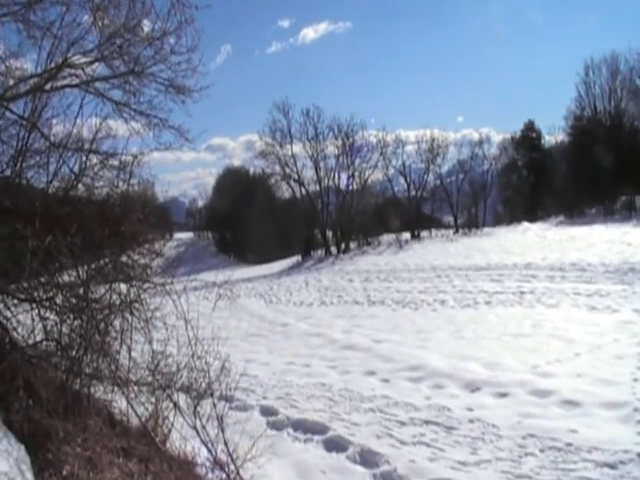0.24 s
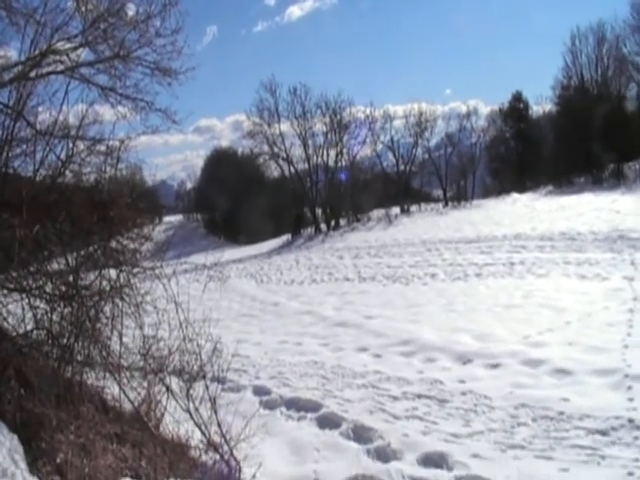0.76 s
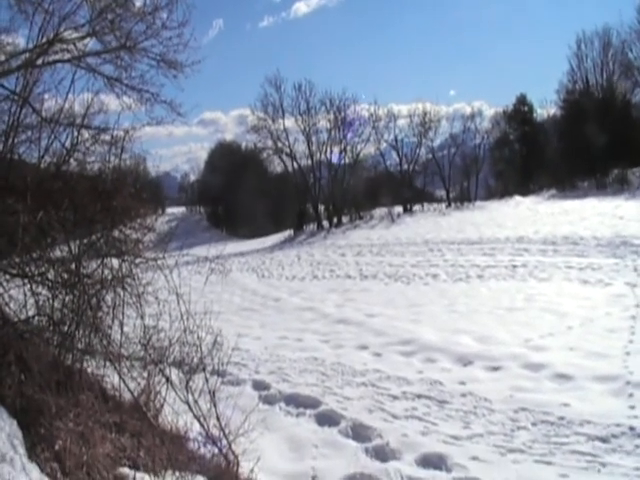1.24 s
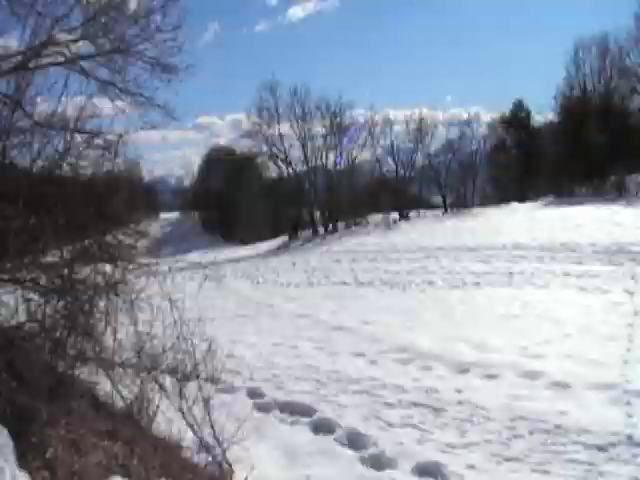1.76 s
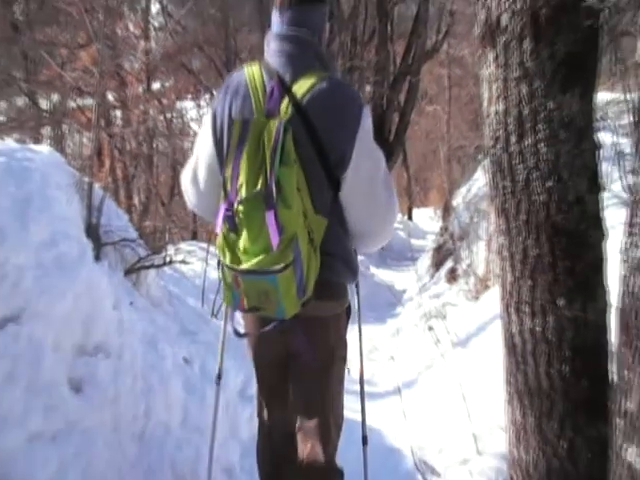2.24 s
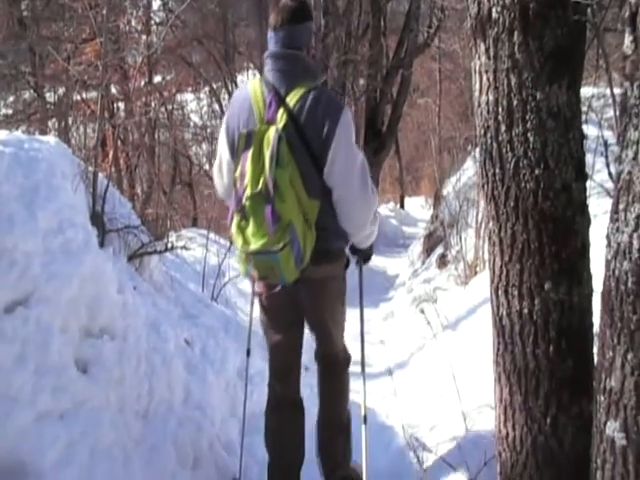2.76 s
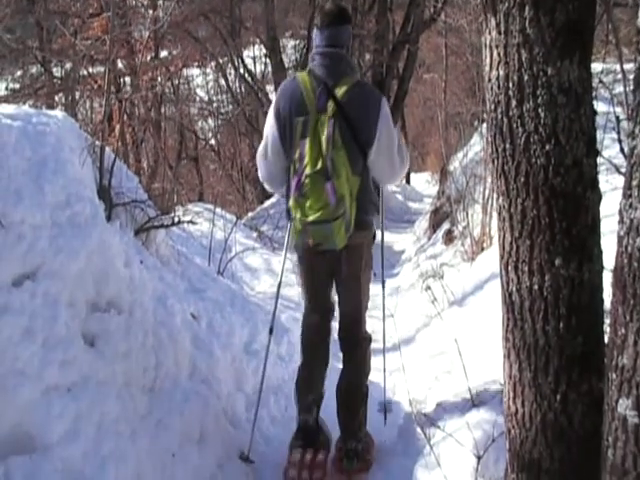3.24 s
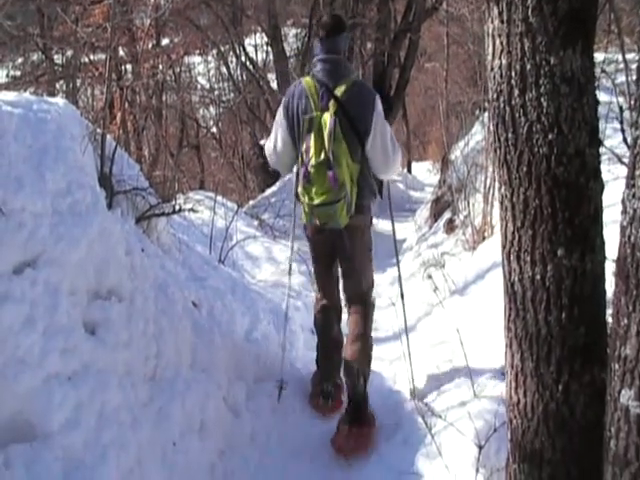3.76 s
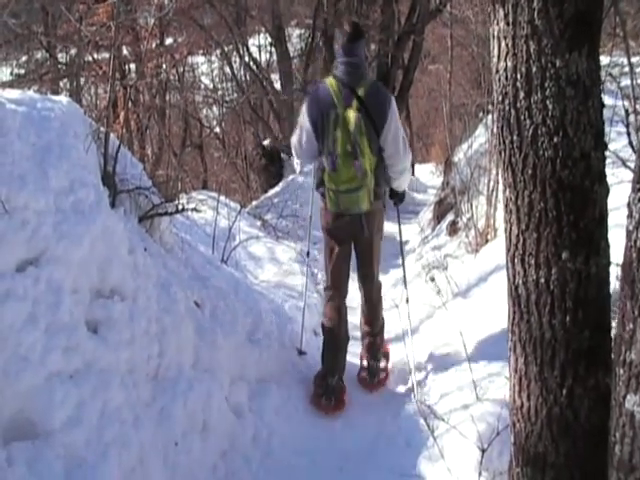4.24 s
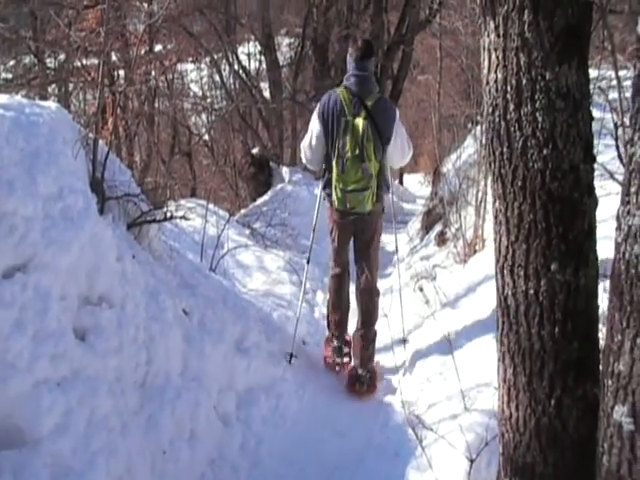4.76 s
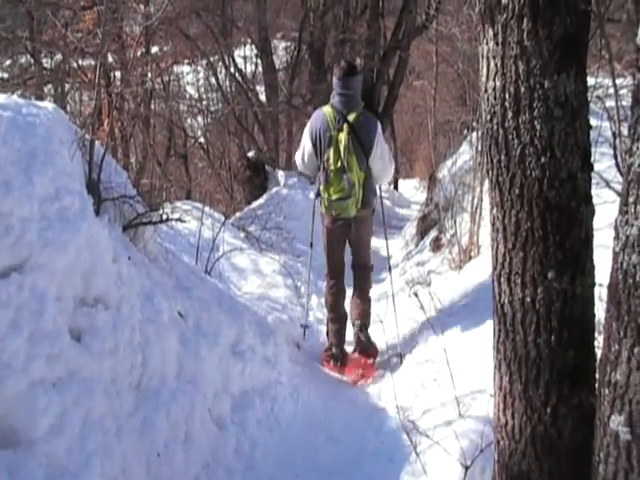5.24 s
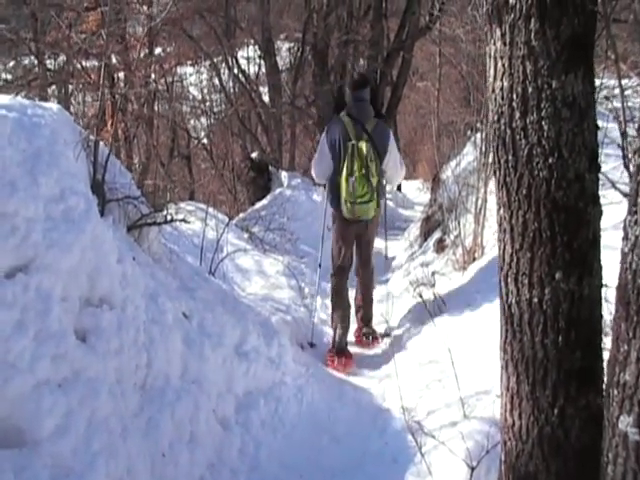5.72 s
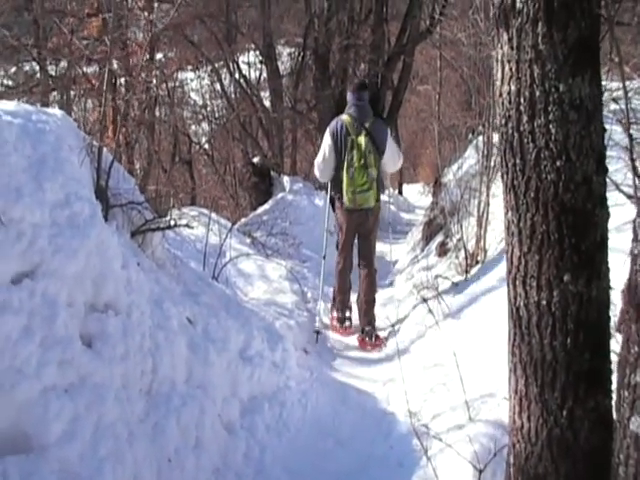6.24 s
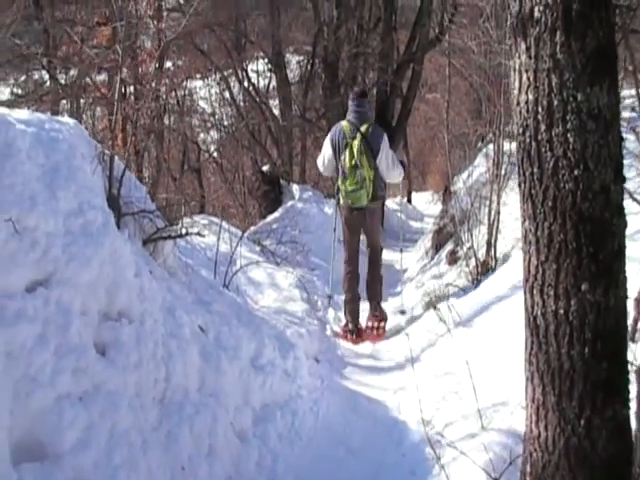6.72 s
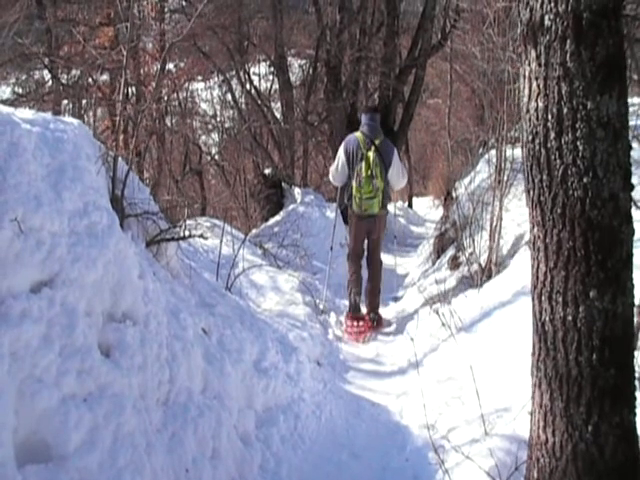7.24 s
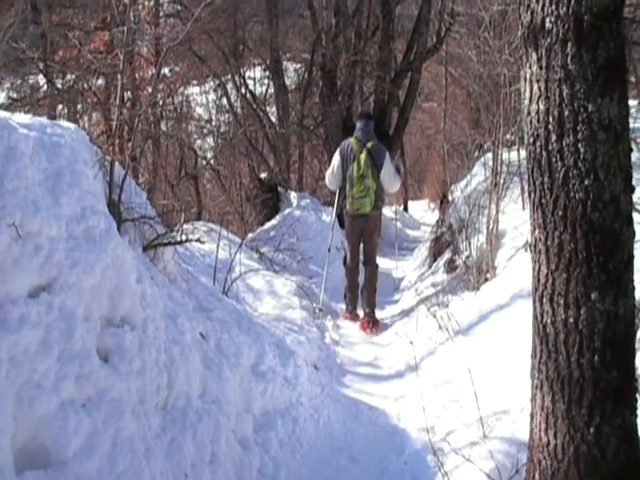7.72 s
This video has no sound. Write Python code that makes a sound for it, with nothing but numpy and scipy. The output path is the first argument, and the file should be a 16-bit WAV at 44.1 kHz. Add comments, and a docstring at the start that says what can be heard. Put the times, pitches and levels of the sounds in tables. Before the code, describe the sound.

From 0 to 1.9 seconds, a still snowy field is almost silent: thin hiss, a very faint steady motor whine near the camera, and from about 0.6 soft rustles and low wind puffs. A dull plastic tick comes at 0.8, a brighter, louder one at 0.95; the strongest wind rumble bumps at 1.4, with a smaller one at 1.7. At 1.9 an abrupt cut brings close, loud snowshoe crunching and a fuller background hiss. Dense, gritty grains swell and break off, with bright ice cracks crowding 1.9 to 2.4, then heavy crunches around 2.6 and sharp snaps at 3.1, 3.4, 3.5 and 4.0. Between steps the dragging shoe tail makes short crumbly bursts. After 4.2 it grows lighter and gappier, with cracks near 5.3, 5.9 and 6.4. Fainter, receding crunches continue to about 8 seconds, with crisp snaps at 7.65 and 7.8.

```python
"""A walker on snowshoes moves away: grains of noise swell into dense crunches, with ringing cracks of crust
and short bursts as the dragged shoe tail bumps along. This starts after a cut from a still snowy field.
In the field, low rumbling noise makes puffs of wind on the microphone, and soft grains make faint rustles.
The camera body ticks twice, as fading tones with a rattle; its motor whines faintly, a wavering sine.
Filtered noise makes the background hiss, which changes at the cut."""
import sys
import numpy as np
from scipy import signal
from scipy.fft import rfft, irfft, next_fast_len
from scipy.io import wavfile
from scipy.ndimage import uniform_filter1d

SR = 44100
rng = np.random.default_rng(int(sys.argv[2]) if len(sys.argv) > 2 else 0)


def generate_wav(signal):
    """Clip the signal to [-1, 1] and save it as 16-bit WAV at the path in sys.argv[1]."""
    frames = np.transpose(np.atleast_2d(signal))
    scaled = np.clip(frames, -1, 1) * 32767
    pcm = np.round(scaled).astype(np.int16)
    wavfile.write(sys.argv[1], SR, pcm)


N = 351918
CUT_S = 1.892  # the field ends and the walk begins

# Steps of the walker. Each row: shoe touches in seconds, full weight in seconds, shoe lifts in seconds,
# level in dB.
STEPS = [(1.89, 2.0, 2.05, -28), (2.113, 2.144, 2.21, -40), (2.47, 2.618, 2.76, -31),
         (2.832, 2.97, 3.09, -34), (3.12, 3.25, 3.425, -29.5), (3.648, 3.67, 3.66, -42),
         (3.724, 3.916, 4.02, -29), (4.328, 4.512, 4.68, -33.5), (5.035, 5.25, 5.275, -33.5),
         (5.299, 5.317, 5.31, -34.5), (5.377, 5.4, 5.44, -39.5), (5.59, 5.634, 5.685, -41.5),
         (5.733, 5.9, 6.06, -37.5), (6.39, 6.58, 6.655, -38), (7.113, 7.15, 7.24, -42),
         (7.25, 7.294, 7.41, -39), (7.771, 7.945, 8.27, -40)]
# The sound swells as weight comes on, sags as it rolls off and stops when the shoe lifts.
LOAD_DB_PER_S, SAG_DB_PER_S, LIFT_DB_PER_S = 41.5, 43, 502
# Loose snow trickles between steps and fades as the walker moves away.
LOOSE_DB, RECEDE_DB_PER_S = -54, 0.6

# Crunches as the crust gives way or the shoe tail bumps. Each row: start in seconds, level in dB,
# length in ms, swell from start to end in dB, tilt towards bright in dB.
CRUNCHES = [(1.89, -23, 45, 5, -1.5), (1.924, -28, 44, -4, -10), (1.974, -24, 25.6, 0, 0),
            (2.044, -18.5, 12.7, -6, 9), (2.074, -30, 5.7, -17, 2), (2.119, -27.5, 6, -5, 10),
            (2.127, -22, 30.4, -19, 11), (2.207, -22, 19, 0.5, 5.5), (2.272, -24.5, 9.5, -7, -5),
            (2.359, -28, 20, -10, -3.5), (2.401, -21.5, 4, 0, -10), (2.428, -35.5, 25.3, -6, 3),
            (2.464, -30, 43, -4, -4), (2.515, -31.5, 26, -2, 3), (2.553, -31.5, 40, -16, -9),
            (2.616, -24.5, 40.7, -2, -9.5), (2.674, -23.5, 43, -13, 2.5), (2.743, -23, 20.4, 3, 1),
            (2.818, -38.5, 23, 4, 2), (2.875, -24, 28, -11.5, 3), (2.925, -32, 8.2, -1, -4),
            (3.041, -27.5, 39, -7, 34), (3.119, -10, 5.8, -21, 26), (3.129, -32, 17, 15, 5),
            (3.245, -23, 33, 6, -5), (3.295, -25.5, 31, 1, -3), (3.37, -17, 19.6, -3, 6.5),
            (3.415, -38, 25, -6, -7), (3.5, -31, 6, 0, 9), (3.53, -21.5, 20.5, -1.5, 10),
            (3.598, -39, 9, -6, -20), (3.644, -33.5, 26, 2, 8.5), (3.771, -30, 27, -20.5, -10),
            (3.832, -28.5, 71, -8, -4), (3.978, -16.5, 11, 1.5, 10.5), (4.071, -24.5, 22.6, -12, 8),
            (4.108, -40, 5, -5, 0), (4.154, -38, 6, -13, 0), (4.188, -25, 24.7, -19.5, 1),
            (4.223, -33, 12, -4, -3), (4.256, -27.5, 9.5, -6, -10.5), (4.323, -34, 26, -17, 0.5),
            (4.367, -28.5, 9.7, -22, -14), (4.427, -27, 11, 0, -6), (4.517, -25, 28.8, 7, -7),
            (4.566, -26.5, 37, -16, 5), (4.623, -24.5, 13.5, 9.5, 12.5), (4.682, -34.5, 18, 5, -2.5),
            (4.748, -29.5, 21.4, 3, 9), (4.842, -32.5, 15.3, -7, 5), (4.927, -38, 11.6, 2, 18),
            (5.056, -36, 15.6, 2, 9), (5.123, -25.5, 10, -15, -10), (5.291, -27.5, 23, -7, 2),
            (5.333, -22, 17.5, -2, 10), (5.38, -36.5, 45, -13, -1), (5.431, -32.5, 13, -19, -14),
            (5.521, -35.5, 13, -5, 9), (5.56, -35.5, 5.8, -7, -4), (5.836, -32, 15, -17, 0),
            (5.881, -33, 40, -9, 9), (5.933, -22, 18.7, -5, 1), (6.015, -24.5, 16, -15, 7.5),
            (6.106, -29.5, 8, -30, 7), (6.154, -35.5, 13.4, 2, -2), (6.257, -38.5, 23, 0, 9.5),
            (6.389, -33.5, 14, -13, 9), (6.44, -21.5, 5.3, -27, 5.5), (6.533, -31, 95, -4.5, 1.5),
            (6.67, -44.5, 36, 7, -2), (6.705, -26.5, 22.2, 3.5, 5), (6.819, -33.5, 15.7, -1, 2),
            (6.925, -34, 19, -6, 9), (7.023, -28.5, 9, -8.5, -6), (7.109, -39.5, 9.2, -10, 13),
            (7.144, -35, 25.5, 6, 10), (7.274, -33, 35, 2, -3), (7.319, -31.5, 28, -12, 6),
            (7.405, -28.5, 15.5, 9, 8), (7.531, -34, 11.2, 4, 5), (7.643, -24, 15.2, -8, 12.5),
            (7.721, -32, 15.5, -17, -3.5), (7.777, -36, 10, 5, 9), (7.798, -33, 4, -9, -1),
            (7.817, -27.5, 7, -11, 5.5), (7.944, -27, 16, 0, -12)]
# Small random collapses of the snow
CLUMPS_PER_S, CLUMP_SPREAD_DB, CLUMP_MS = 45, 4.5, 8
CLUMP_SWELL_DB, CLUMP_TILT_DB = -5.5, 5
# Balance of every crunch; the tilt is split between its deep and bright parts.
DEEP_HZ, BRIGHT_HZ = 1300, 4500
DEEP_DB, BRIGHT_DB, DEEP_SHARE = -2.5, 3, .6
# Both ends of the crunch thin out as the walker moves away.
DEEP_FADE_DB_PER_S, BRIGHT_FADE_DB_PER_S = 0.81, 0.66

# Single loud breaks of ice and knocks of the crust. Each row: start in seconds, level in dB, pitch in Hz.
SNAPS = [(1.906, -16, 1780), (1.936, -3.5, 6800), (2.051, -5.5, 5500), (2.12, -19, 6960),
         (2.212, -6.5, 5700), (2.402, -20.5, 640), (2.645, -14, 2600), (3.121, -6.5, 8650),
         (3.141, -12.5, 840), (3.276, -12, 3380), (3.381, -6, 3670), (3.389, -3.5, 4330),
         (3.535, -10, 7940), (3.543, -7.5, 4850), (3.983, -4.5, 3080), (4.081, -18, 1380),
         (4.197, -12, 8300), (4.43, -23.5, 720), (4.54, -16.5, 2230), (5.077, -24, 3500),
         (5.125, -23.5, 600), (5.265, -21, 7000), (5.296, -14, 6500), (5.4, -19, 765), (5.94, -5.5, 6300),
         (6.024, -9, 4860), (6.11, -20, 6300), (6.441, -4.5, 7730), (7.651, -16.5, 9000),
         (7.817, -13, 7600)]

# Tone of the snow. Each row: frequency in Hz, gain in dB.
SNOW_TONE = [(90, -5.5), (160, -1), (300, -4), (450, 3), (800, 3), (1200, 2.5), (1450, 4), (1900, -2),
             (3000, 2), (4400, 1.5), (6800, 8.5), (10900, 5), (16000, -10.5)]
# How much differs between the two sides. Each row: frequency in Hz, gain of the unshared part in dB.
SIDE_TONE = [(100, -43.5), (500, -17), (1500, -74), (3000, -21), (7000, -15), (9500, -12), (12000, -11),
             (15000, -31)]
# Lean of the snow sound to one side. Each row: frequency in Hz, left minus right in dB.
LEFT_RIGHT_LEAN = [(300, -0.5), (1800, -1.5), (3600, -0.5), (4800, -0.5), (7500, -2), (9500, -3.5),
                   (11500, -2), (13000, 0)]

# Puffs of wind. Each row: peak in seconds, level in dB.
PUFFS = [(.66, -61), (.76, -56), (.89, -56), (1.06, -60), (1.27, -57.5), (1.44, -44.5), (1.54, -55),
         (1.7, -50), (2.2, -63)]
PUFF_RISE_DB_PER_S, PUFF_FALL_DB_PER_S, CALM_DB = 200, 200, -77.5
# Tone of the wind. Each row: frequency in Hz, gain in dB.
WIND_TONE = [(8.8, -32), (15, 7), (85, 10.5), (255, -7), (357, -34), (425, -11), (500, -31), (650, -66),
             (1100, -120)]

# Faint rustles near the camera. Each row: peak in seconds, level in dB.
RUSTLES = [(.585, -65), (.69, -58.5), (.8, -61), (.83, -56), (.88, -67), (1.08, -64), (1.16, -66),
           (1.7, -70), (1.8, -68)]
RUSTLE_RISE_DB_PER_S, RUSTLE_FALL_DB_PER_S, STILL_DB = 400, 200, -76.5

# Ticks of the camera body. Each row: start in seconds, level in dB, treble edge in Hz,
# time to fade by 60 dB in seconds (on top of the ringing's own fade), left minus right in dB.
TICKS = [(.822, -29.5, 2960, 0.039, -5), (.953, -15.5, 8400, 0.019, 4)]
# Ringing tones of the camera body. Each row: pitch in Hz, relative level in dB,
# time to fade by 60 dB in seconds.
SHELL_TONES = [(650, 5, 0.093), (1260, -3, 0.019), (1800, -16, .03), (2420, 11, 0.014), (3870, 2, 0.018),
               (5470, 9, 0.0053)]
# Whine of the camera motor. Each row: pitch in Hz, average level in dB.
WHINE = [(842.5, -72)]

# Still air and preamp hiss before the cut. Each row: frequency in Hz, gain in dB.
FIELD_TONE = [(24, -40), (40, -4), (412, -5), (680, -7), (831, -7), (918, -8.5), (4800, -17.5),
              (10000, -22.5), (16000, -33)]
# Background hiss after the cut. Each row: frequency in Hz, gain in dB.
WOODS_TONE = [(25, -1), (70, 0.5), (200, 17), (490, 3), (1400, 2), (5400, -3.5), (8800, -26), (11000, -18),
              (16000, -31)]
FIELD_DB, WOODS_DB = -63, -56

EDGE_HZ, CEILING = 16000, .9  # top of the band, loudest possible swing before the band limit


def snowshoes():
    """Snow grains in deep, middle and bright parts, each following its own pressure, plus the snaps."""
    grain_pair = grains(per_s=2000, spread_db=3.0, ring_ms=1.0, patchy_db=3.0)
    mid, side = colour(grain_pair, lambda hz: read(SNOW_TONE, hz))
    side = colour(side, lambda hz: read(SIDE_TONE, hz))
    both = np.array([mid, side])
    deep = colour(both, lambda hz: keep_below(hz, DEEP_HZ, 6))
    bright = colour(both, lambda hz: keep_above(hz, BRIGHT_HZ, 6))
    middle = both - deep - bright
    mid, side = sum(part / np.std(part[0]) * np.sqrt(power)
                    for part, power in zip((deep, middle, bright), pressure()))
    # Soft snow gives no thud and dulls the top.
    mid = colour(mid + snaps(), lambda hz: -10 * np.log10(1 + (140 / (hz + 1)) ** 6 + (hz / 12500) ** 6))
    left = colour(mid, lambda hz: read(LEFT_RIGHT_LEAN, hz) / 2)
    right = colour(mid, lambda hz: -read(LEFT_RIGHT_LEAN, hz) / 2)
    return np.array([left + side, right - side])


def pressure():
    """Power over time of the deep, middle and bright parts: steady packing plus separate crunches."""
    packing_db = packing()
    depth_db = 0.087 * (packing_db + 20.5)  # more weight on the shoe packs deeper snow
    balance_db = np.array([depth_db - 10.5, np.full(N, -6.0), -depth_db - 4.0])
    power = gain_of(packing_db + balance_db) ** 2
    ms = np.arange(0, 110, 1000 / SR)
    for s, db, length_ms, swell_db, tilt_db in CRUNCHES + clumps(packing_db):
        length_ms = max(length_ms, 2)
        over_ms = np.maximum(ms - length_ms, 0)
        body_db = swell_db * (np.minimum(ms / length_ms, 1) - .5) - 1.76 * over_ms
        crumbs_db = -27 - 0.076 * over_ms  # loose crumbs settle afterwards
        rise = np.minimum(ms / (3.0 + 0.19 * length_ms), 1) ** 2
        shape = rise * (gain_of(2 * body_db) + gain_of(2 * crumbs_db))
        walked_s = s - CUT_S
        deep_db = DEEP_DB - DEEP_FADE_DB_PER_S * walked_s - DEEP_SHARE * tilt_db
        bright_db = BRIGHT_DB - BRIGHT_FADE_DB_PER_S * walked_s + (1 - DEEP_SHARE) * tilt_db
        parts = gain_of([deep_db, 0, bright_db]) ** 2
        add(power, s, parts[:, None] / parts.sum() * gain_of(2 * db) * shape)
    return power * (np.arange(N) > CUT_S * SR)


def packing():
    """Level in dB of the steady packing: one weight shift per step, over trickling loose snow."""
    t = np.arange(N) / SR
    steps = []
    for touch, full, lift, db in STEPS:
        off_ground_s = np.maximum(touch - t, 0) + np.maximum(t - lift, 0)
        steps.append((full, db - LIFT_DB_PER_S * off_ground_s))
    loose_db = LOOSE_DB - RECEDE_DB_PER_S * (t - CUT_S)
    return swells(steps, LOAD_DB_PER_S, SAG_DB_PER_S, loose_db)


def clumps(packing_db):
    """Small collapses at random moments, their levels scattered around the packing level."""
    count = int(CLUMPS_PER_S * N / SR)
    when, size, long, tilt = rng.random((count, 4)).T
    s = (np.arange(count) + when) / CLUMPS_PER_S
    packing_now = packing_db[np.minimum((s * SR).astype(int), N - 1)]
    db = packing_now - CLUMP_SPREAD_DB * np.log(1 / (size + .02))
    length_ms = CLUMP_MS * (0.27 + long)
    swell_db = np.full(count, CLUMP_SWELL_DB)
    return list(zip(s, db, length_ms, swell_db, CLUMP_TILT_DB * (2 * tilt - 1)))


def grains(per_s, spread_db, ring_ms, patchy_db):
    """Snapping ice bonds: random clicks of uneven size become short noisy puffs with drifting colour."""
    size = gain_of(spread_db * np.minimum(rng.exponential(1, N), 5)) * (rng.random(N) < per_s / SR)
    fading = signal.lfilter([1], [1, -np.exp(-1000 / (ring_ms * SR))], size ** 2)
    soft = uniform_filter1d(fading, size=24)  # soft starts
    sharp = uniform_filter1d(size ** 2 * (size > 6), size=12)  # grains above size 6 would crack sharply, but no grain grows that large, so this adds nothing
    power = soft + .5 * sharp * ring_ms * SR / 1000
    puffs = np.sqrt(power) * rng.standard_normal((2, N))
    # Louder and softer patches across time and frequency
    hz, t, spectrum = signal.stft(puffs, SR, nperseg=256, noverlap=192)
    patches = uniform_filter1d(rng.standard_normal((len(t), len(hz))), size=14, axis=0)
    patches = evened(uniform_filter1d(patches, size=3, axis=1)).T
    patchy = spectrum * gain_of(patchy_db * patches)
    return signal.istft(patchy, SR, nperseg=256, noverlap=192)[1][:, :N]


def snaps():
    """Each break is a puff of gritty noise that also rings at its own pitch."""
    out, t = np.zeros(N), np.arange(1200) / SR
    for s, db, hz in SNAPS:
        noise = rng.standard_normal(len(t))
        puff = noise * np.minimum(t / 0.00019, 1) * np.exp(-t / 0.00056)
        ring = signal.lfilter(*signal.iirpeak(hz, 1 / 0.14, SR), puff)  # 14 % of the pitch wide
        grit = uniform_filter1d(puff, size=3)  # little extreme treble
        burst = ring / abs(ring).max() + 0.48 * grit / abs(grit).max()
        add(out, s, gain_of(db) * burst)
    return out


def wind():
    """Lumpy low noise, unrelated at the two microphone ports and stronger on the left."""
    lumps = uniform_filter1d(rng.standard_normal((2, N)), size=1500)
    lumps = evened(uniform_filter1d(lumps, size=1500))
    rumble = colour(rng.standard_normal((2, N)), lambda hz: read(WIND_TONE, hz))
    rumble = evened(rumble * gain_of(1.1 * lumps))
    level_db = swells(PUFFS, PUFF_RISE_DB_PER_S, PUFF_FALL_DB_PER_S, CALM_DB)
    return rumble * gain_of(level_db + np.array([[4.5], [-0.5]]))


def rustle():
    """Sparse soft grains in one broad resonance, until the cut."""
    scratch = grains(per_s=380, spread_db=1, ring_ms=2.6, patchy_db=5.0)[0]
    scratch = colour(scratch, lambda hz: -10 * np.log10(1 + ((hz - 1880) / 220) ** 2))
    level_db = swells(RUSTLES, RUSTLE_RISE_DB_PER_S, RUSTLE_FALL_DB_PER_S, STILL_DB)
    return evened(scratch) * gain_of(level_db) * (np.arange(N) < CUT_S * SR)


def camera():
    """A motor whine plus ticks of the plastic shell."""
    return motor_whine() + shell_ticks()


def motor_whine():
    """A sine that wavers slightly in loudness and phase, equal on both sides."""
    waver = evened(uniform_filter1d(rng.standard_normal(N), size=4000))
    turn = 2 * np.pi * np.arange(N) / SR
    whine = np.zeros(N)
    for hz, db in WHINE:
        whine += np.sqrt(2) * gain_of(db + .8 * waver) * np.sin(hz * turn + .5 * waver)
    return np.array([whine, whine])


def shell_ticks():
    """Each tick mixes the shell's fading tones with a noisy rattle."""
    ticks, t = np.zeros((2, N)), np.arange(1500) / SR
    ring = sum(gain_of(db - 60 * t / fade_s) * np.sin(2 * np.pi * hz * t) for hz, db, fade_s in SHELL_TONES)
    for s, db, treble_hz, fade_s, pan_db in TICKS:
        rattle = rng.standard_normal(len(t))
        tick = (0.12 * ring + .5 * rattle) * gain_of(-60 * t / fade_s)
        dull = signal.butter(2, min(treble_hz, SR / 2.2), fs=SR, output="sos")
        tick = signal.sosfilt(dull, tick)  # a soft tick has less treble
        add(ticks, s, gain_of(db + np.array([[.5], [-.5]]) * pan_db) * tick)
    return colour(ticks, lambda hz: keep_above(hz, 520, 8))


def air():
    """Background hiss from filtered noise, partly shared by both sides; it changes at the cut."""
    shared, left, right = rng.standard_normal((3, N))
    own = np.array([left, right])
    field = evened(colour(shared + 3.4 * own, lambda hz: read(FIELD_TONE, hz)))
    woods = evened(colour(shared + 0.37 * own, lambda hz: read(WOODS_TONE, hz)))
    after_cut = np.arange(N) > CUT_S * SR
    return np.where(after_cut, gain_of(WOODS_DB) * woods, gain_of(FIELD_DB) * field)


def swells(rows, rise_db_per_s, fall_db_per_s, rest_db):
    """Level in dB of events (peak s, dB) that rise and fall, summed in power over a resting level."""
    t = np.arange(N) / SR
    power = gain_of(2 * rest_db)
    for s, db in rows:
        drop_db = rise_db_per_s * np.maximum(s - t, 0) + fall_db_per_s * np.maximum(t - s, 0)
        power = power + gain_of(2 * (db - drop_db))
    return 10 * np.log10(power)


def gain_of(db):
    """Turns dB into a factor for the sound wave."""
    return 10 ** (np.asarray(db) / 20)


def evened(x):
    """Scales a sound to an average (rms) level of 1."""
    return x / np.sqrt(np.mean(x ** 2) + 1e-20)


def read(points, hz):
    """Reads a table of (Hz, dB) at any frequency, in straight lines over log frequency."""
    f, value = np.transpose(points)
    return np.interp(np.log(hz + 1), np.log(f + 1), value)


def keep_below(hz, edge_hz, power):
    """Gain in dB that drops away above the edge."""
    return -10 * np.log10(1 + (hz / edge_hz) ** power)


def keep_above(hz, edge_hz, power):
    """Gain in dB that drops away below the edge."""
    return -10 * np.log10(1 + (edge_hz / (hz + 1)) ** power)


def colour(x, db_at):
    """Filters the last axis by a gain given in dB as a function of Hz."""
    size = next_fast_len(N)
    gain = gain_of(db_at(np.fft.rfftfreq(size, 1 / SR)))
    return irfft(rfft(x, size) * gain, size)[..., :N]


def add(mix, s, sound):
    """Adds a sound to the mix from second s, cut short at the end of the mix."""
    part = mix[..., round(s * SR):][..., :sound.shape[-1]]
    part += sound[..., :part.shape[-1]]


def scene():
    """Everything at the two microphone ports."""
    return snowshoes() + wind() + rustle() + camera() + air()


def record(dry):
    """Soft overload of the loudest peaks, then the band limit."""
    held = CEILING * np.tanh(dry / CEILING)
    band_limit = signal.firwin(511, EDGE_HZ, window=("kaiser", 9), fs=SR)
    return signal.oaconvolve(held, band_limit[None], "same")


dry = scene()
out = record(dry)
generate_wav(out)
```